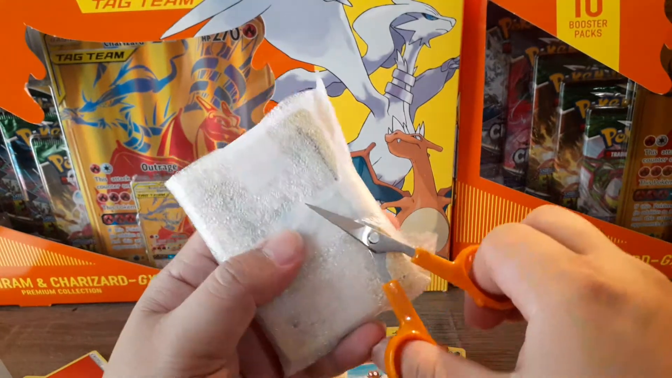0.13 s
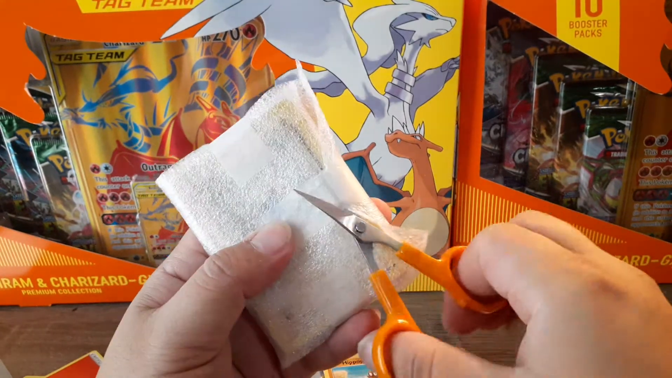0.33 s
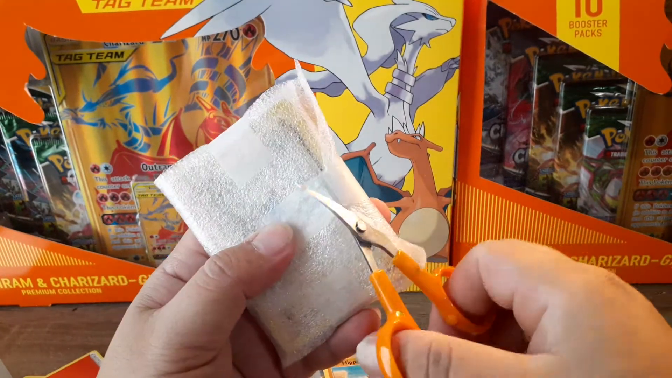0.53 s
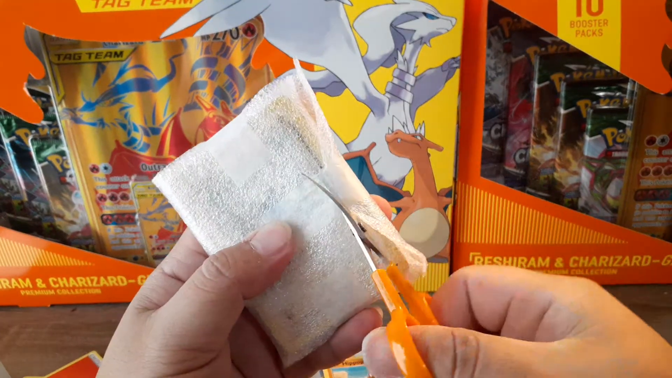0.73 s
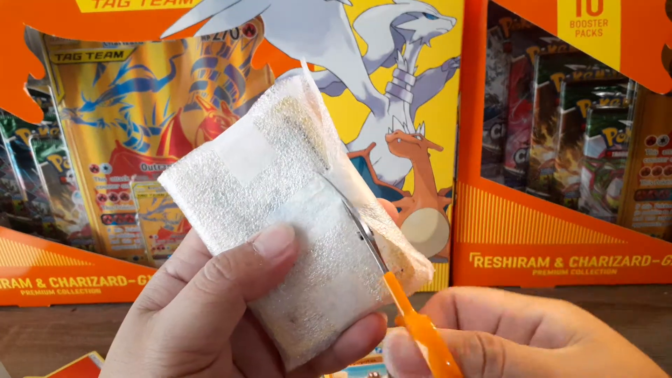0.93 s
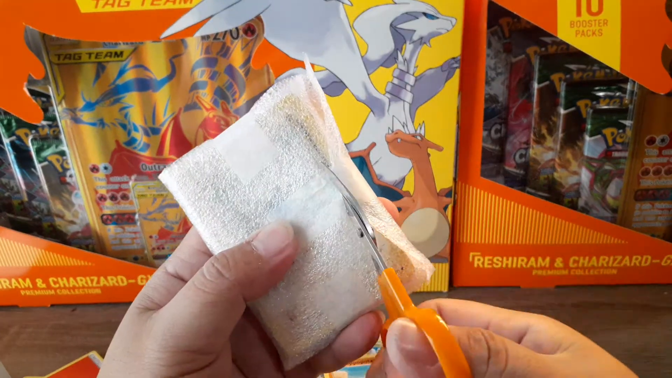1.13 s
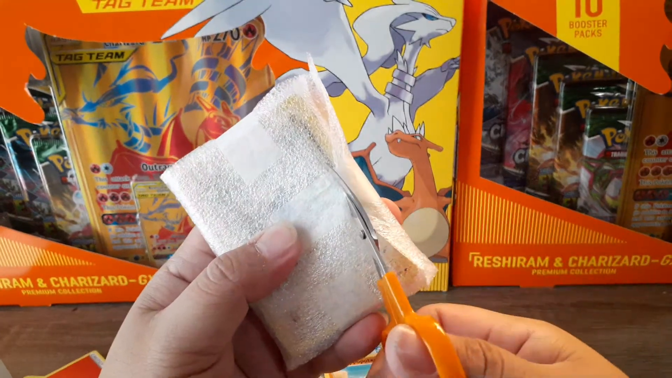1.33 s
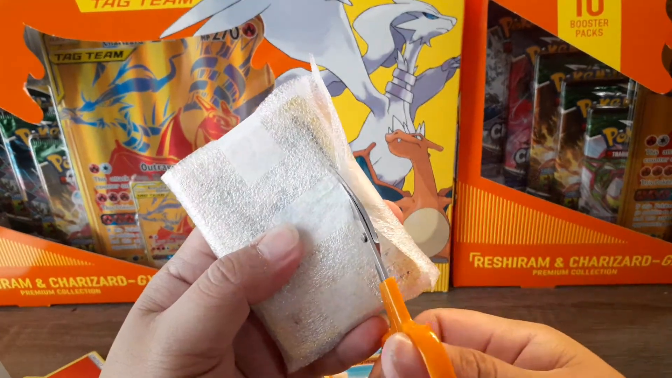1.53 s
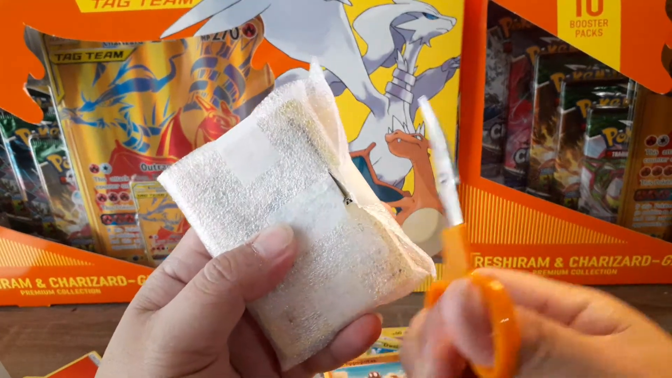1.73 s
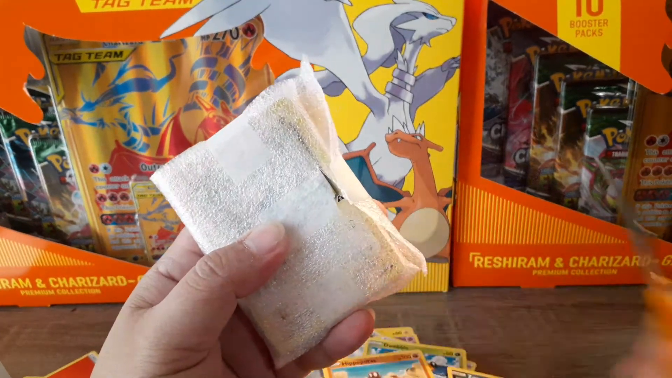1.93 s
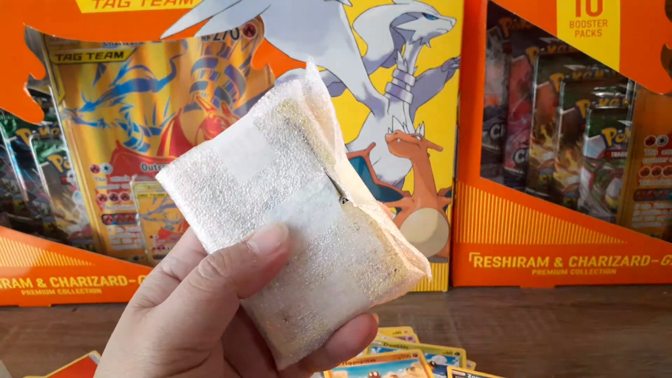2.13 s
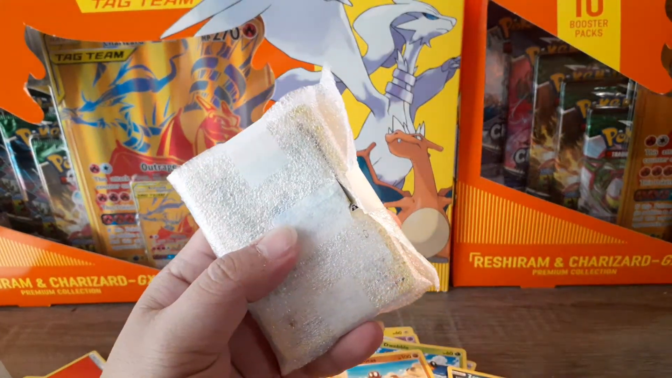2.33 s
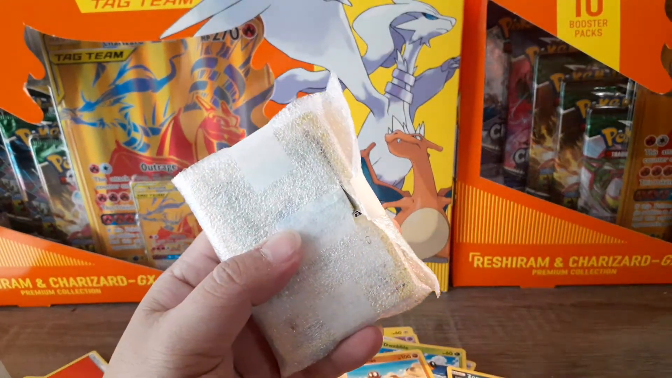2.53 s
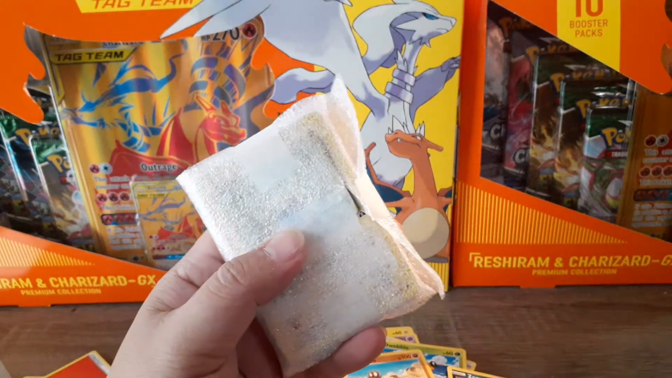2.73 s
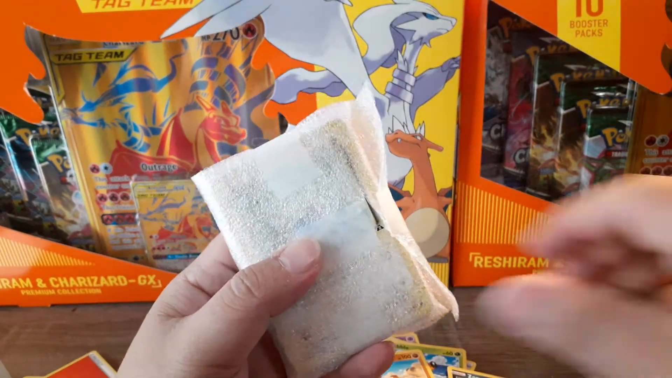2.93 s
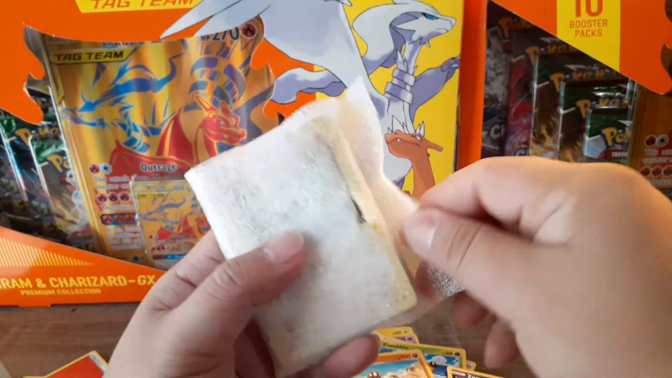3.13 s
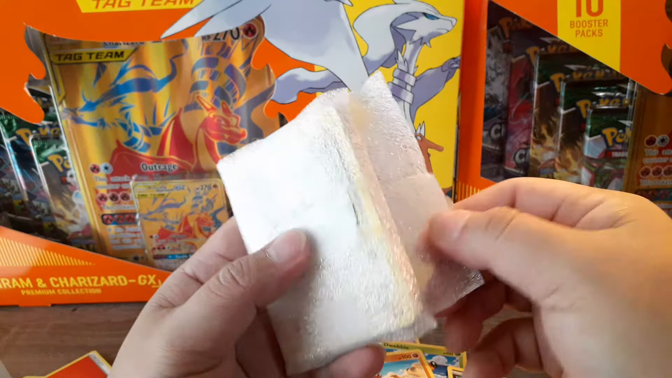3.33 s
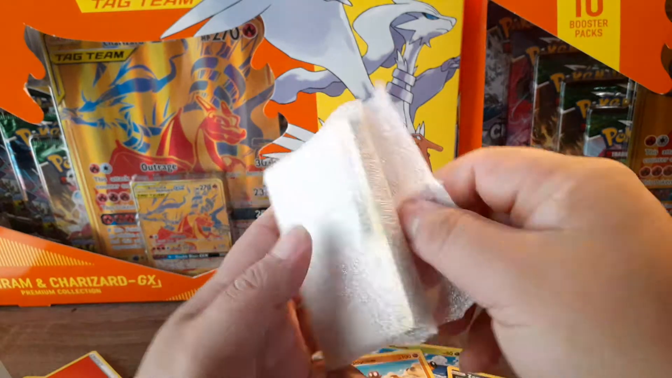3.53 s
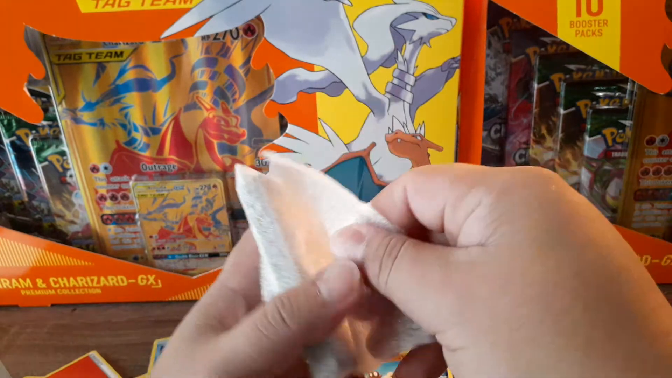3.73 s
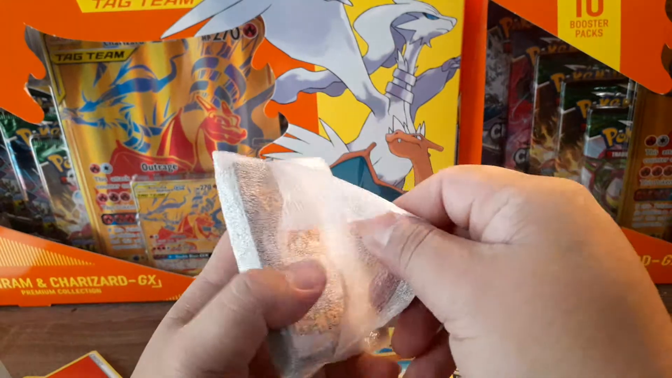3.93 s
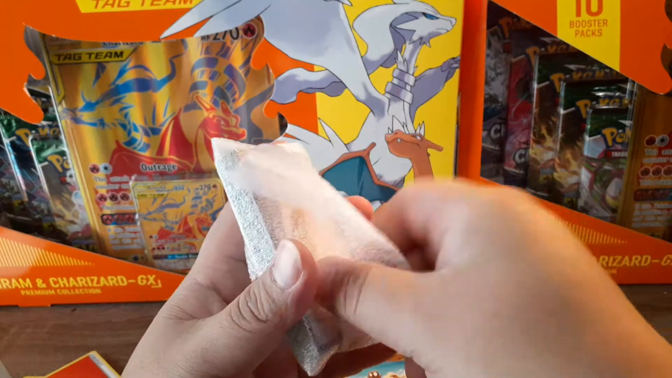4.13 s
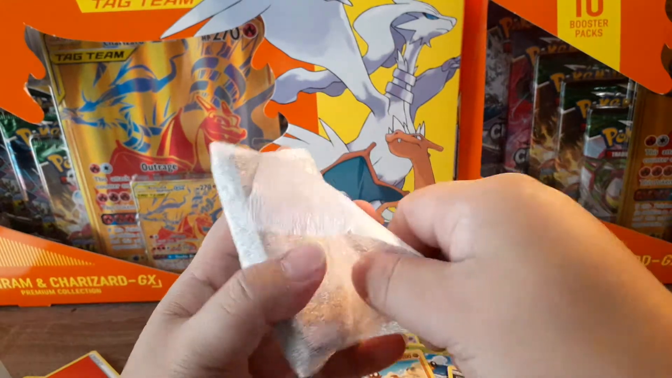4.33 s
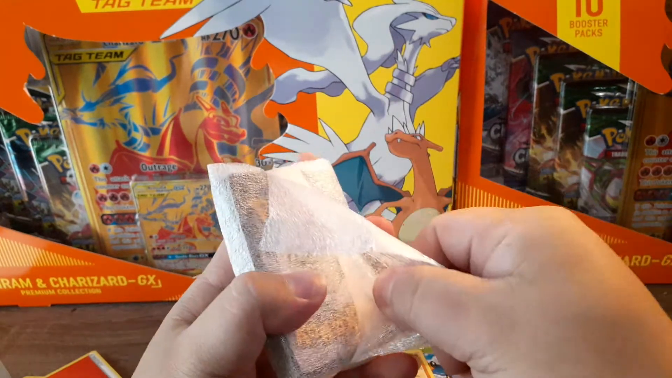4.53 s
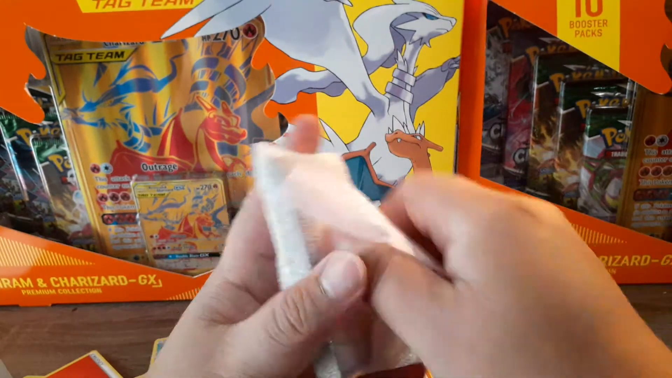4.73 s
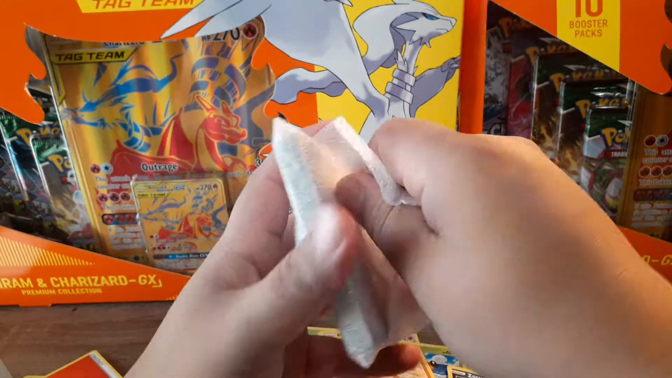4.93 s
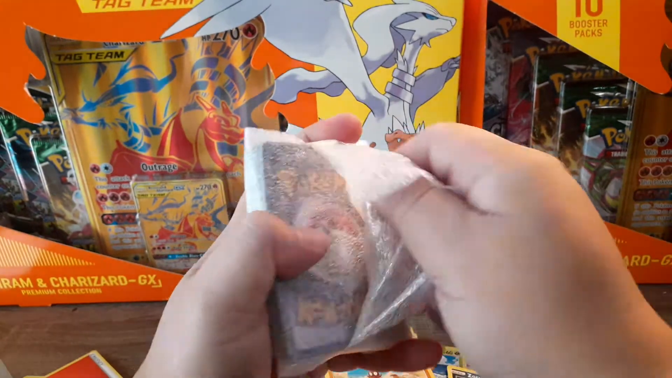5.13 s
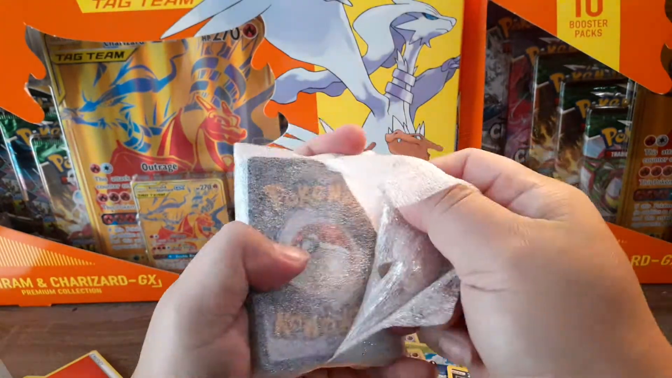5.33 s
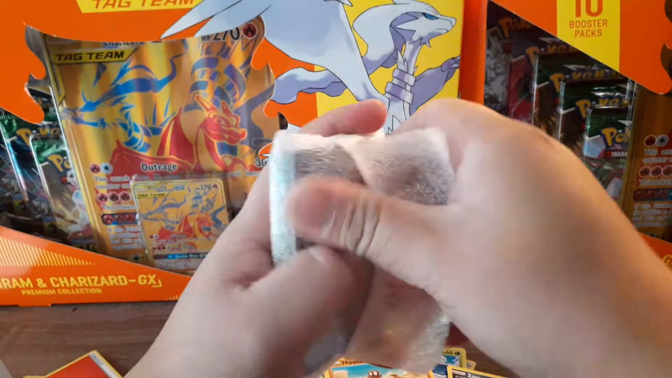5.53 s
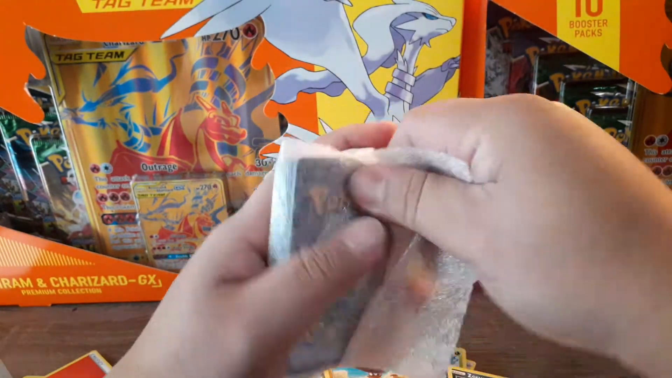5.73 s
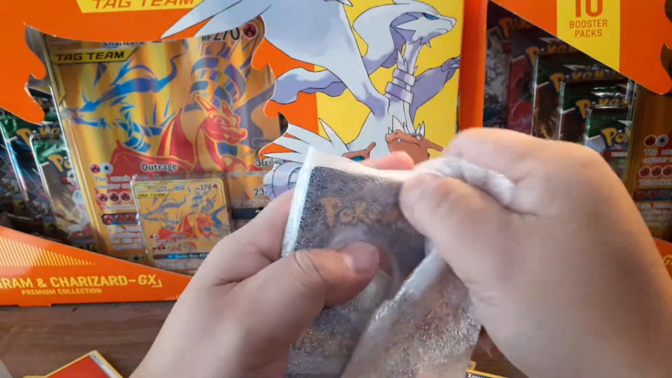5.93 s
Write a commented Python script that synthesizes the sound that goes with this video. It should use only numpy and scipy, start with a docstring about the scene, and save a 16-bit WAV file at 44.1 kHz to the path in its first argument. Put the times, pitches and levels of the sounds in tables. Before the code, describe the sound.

A quiet indoor close-up: two soft foamy pushes of small scissor blades, near silence with light metal ticks, and a crisp double steel clack. Plastic handles tick and bounce on a wooden tabletop, which rings briefly. Then hands bump softly and handle the foam pouch, with grainy rubbing, airy fizz and bursts of crackling that get louder and busier until the end. Sounds sit a little left of centre.

```python
"""In a small room with a low hum, close to a camera's two microphones, small scissors slide through a thin foam
pouch: the blades hiss, foam cells part and tick, and the edges clack shut. The scissors are then put down on a
wooden table, where handle ticks set the wood's modes ringing. Last, fingers pull the pouch open: grainy noise
rubs and fizzes, pulses crinkle and snap, the wall pops with sagging tones, and the hands bump in low thuds, all
a little left of the microphones."""
import sys
import numpy as np
from scipy import signal
from scipy.fft import rfft, irfft, next_fast_len
from scipy.io import wavfile
from scipy.ndimage import uniform_filter1d, map_coordinates

SR = 44100
rng = np.random.default_rng(int(sys.argv[2]) if len(sys.argv) > 2 else 0)


def to_wav(s):
    """Save 16-bit WAV."""
    ch = np.atleast_2d(s).T  # columns
    pcm = np.round(np.clip(ch, -1, 1) * 32767)  # PCM
    wavfile.write(sys.argv[1], SR, pcm.astype(np.int16))


N = 268569  # samples

# All levels are relative, before the gains in each source's mix.
# Strokes of the fingers over the foam.
# Each row: start in seconds, length in seconds, coarse rub in dB, fine fizz in dB.
STROKES = [(3.096, 0.024, -52, -49), (3.138, 0.085, -60, -54), (3.395, 0.017, -42, -42.5),
           (3.448, 0.25, -54, -54.5), (3.783, 0.07, -51.5, -44), (3.903, 0.05, -57.5, -53),
           (4.112, 0.033, -36.5, -37.5), (4.289, 0.085, -48, -46.5), (4.477, 0.015, -40, -34.5),
           (4.738, 0.0073, -32, -37), (4.773, 0.049, -45.5, -41.5), (4.865, 0.056, -44, -45.5),
           (4.929, 0.078, -45, -58), (5.046, 0.025, -47, -41.5), (5.149, 0.04, -40, -32),
           (5.228, 0.067, -40.5, -33.5), (5.324, 0.028, -48.5, -41), (5.484, 0.022, -32.5, -34.5),
           (5.634, 0.051, -40.5, -38), (5.716, 0.28, -52.5, -46), (6.025, 0.15, -40, -39)]
# A stroke or a parting of cells swells, holds and dies away: seconds for 20 dB.
STROKE_ATTACK_S, STROKE_RELEASE_S = 0.041, 0.035
# The fingers are on the foam, and small creases come in the later part: start and length in seconds.
HANDLING, CRUMPLING = (3.085, 3.0), (4.7, 1.385)
# Between strokes the held pouch keeps rustling.
HELD_RUB_DB, HELD_FIZZ_DB = -64.5, -56
# Large creases of the pouch buckling.
# Each row: start in seconds, level in dB, 1 kHz body in dB, 11 kHz sheen in dB.
SNAPS = [(3.0866, -42.5, 7.5, -4.5), (3.1357, -21, -3, -3), (3.395, -37, 7.5, -7.5),
         (3.6431, -37, -5.5, -8.5), (3.9525, -36.5, 2.5, 0.5), (4.1176, -39, 5, -1.5),
         (4.382, -41.5, -1, -12), (4.4013, -31.5, -1, 8), (4.408, -35, -3, 9.5), (4.4212, -27.5, 4, 13),
         (4.447, -18.5, -13, 3.5), (4.474, -21, -28, 6.5), (4.4809, -30, 11.5, 1), (4.493, -22.5, -8.5, 0),
         (4.7173, -17.5, 2.5, -3), (4.7321, -32.5, 5, -3), (4.8106, -29, -9, -3), (5.061, -29, -10, -11.5),
         (5.1216, -23, 3.5, -3), (5.1459, -21.5, -12, -3.5), (5.1621, -28.5, -13, 8),
         (5.1775, -26.5, -2.5, -7.5), (5.2293, -26, -7, -0.5), (5.246, -18.5, -13, 0.5),
         (5.3545, -38, -10, -6), (5.4916, -21, -7.5, -2.5), (5.4975, -27.5, 7, -8.5),
         (5.5428, -25.5, -1.5, 0.5), (5.7022, -30, -22, 1.5), (5.7352, -29.5, -20, 8.5),
         (5.819, -35, -22, -3), (5.889, -35.5, -6.5, -11.5), (5.8974, -34.5, -19, -7.5),
         (5.9105, -34, -6.5, -8), (5.9584, -32.5, -2, -6.5), (5.972, -32.5, -0.5, -6.5),
         (6.012, -27, -3, -22), (6.023, -27, 2, -6), (6.0505, -34, -5, -3.5), (6.0702, -26.5, -14, -0.5),
         (6.0759, -26.5, -8, 1)]
# Each large crease springs back once, a moment later and weaker.
REBOUND_S, REBOUND_DB = 0.0056, -11.5
# Shiver of the foam after a snap: level in dB and t60 in seconds.
SHIVER_DB, SHIVER_T60_S = -14, 0.035
# Small creases, against the mean dB of rub and fizz.
CRINKLES_PER_S, CRINKLE_DB = 90, -2
# Slips of single foam cells, under fingers and blades alike.
SLIPS_PER_S = 900
# Colours of the rub, the fizz and the snaps. Each row: frequency in Hz, density in dB per Hz.
RUB_SPECTRUM = [(120, -32), (420, 8.5), (700, -8), (1300, -1), (2600, 4), (4500, 0.5), (7000, -3),
                (16000, -36.5)]
FIZZ_SPECTRUM = [(2000, -6), (4000, -7), (5500, 2), (8500, -2), (12000, 5), (15500, 9), (17000, -36.5)]
SNAP_SPECTRUM = [(100, 3), (400, -19), (900, 5.5), (7000, 9), (16000, 9.5)]
# How alike close sounds reach the two microphones.
# Each row: frequency in Hz, left-right likeness (1 is identical).
FOAM_ALIKE = [(300, 0.99), (1500, 0.24), (5000, 0.029), (15000, 0.083)]
# The pouch wall flexing like a small drum.
# Each row: start in seconds, level in dB, settled pitch in Hz, t60 in seconds, higher ring in dB.
FLEXES = [(1.656, -34, 409, .03, -4), (3.14, -31.5, 425, 0.03, 2), (4.447, -28.5, 293, 0.0086, -20),
          (4.492, -33, 330, 0.0089, -10), (4.733, -19, 426, 0.056, -2), (5.2447, -15, 260, 0.0077, -13),
          (5.49, -25, 224, 0.035, -22), (5.493, -21, 395, 0.028, -10), (5.681, -20.5, 550, 0.015, 0.5)]
# The wall slackens as it rings: its pitch starts this share higher and sinks with this time constant.
FLEX_SAG, FLEX_SAG_S = 0.15, 0.008
RING_HZ = 1340  # the brief higher ring of the stiff stack of cards inside

# Ticks of foam cells cut by the blades, and the steel edges clacking shut. # Each row: start in seconds, level
# in dB, 1 kHz body in dB, 11 kHz sheen in dB.
BLADES = [(0.0628, -36.5, -6, 5), (0.3884, -43.5, 8, 11), (0.4527, -44, -15, 4), (0.4926, -42, -3, 7),
          (0.5493, -45.5, 5, 5.5), (0.786, -48, 2, 1), (1.1172, -53.5, -7.5, 2), (1.3678, -44.5, -15, 0),
          (1.4964, -50, -1, 1.5), (1.6254, -18.5, -5.5, -7.5), (1.6457, -10, -8, -7),
          (1.648, -25.5, 6.5, -17.5), (1.6565, -27, 3.5, -22)]
# Pushes of the blades through the foam, and last their skid on the table.
# Each row: start in seconds, length in seconds, level in dB.
PUSHES = [(0.067, 0.025, -41), (0.112, 0.024, -34), (0.387, 0.5, -67), (1.365, 0.13, -65.5),
          (1.622, 0.057, -42), (2.523, 0.028, -44.5), (2.567, 0.015, -29)]
# A push swells, holds and dies away: seconds for 20 dB.
PUSH_ATTACK_S, PUSH_RELEASE_S = 0.018, 0.012
# The scissors are in the foam (start and length in seconds); between pushes they keep gliding.
CUTTING, GLIDE_DB = (0.0, 1.6), -70.5
# Foam cells parting along the blades. Each row: start in seconds, length in seconds, level in dB.
SHEARS = [(0.03, 0.45, -70), (0.4, 0.37, -64.5), (0.76, 0.24, -71), (1.85, 0.061, -69)]
# Stray ticks of foam cells cut by the blades, against the glide.
TICKS_PER_S, TICK_DB = 14, 0.5
# Scatter in strength of the stray ticks and small creases.
STRAY_SPREAD_DB = 4
# Colours of the glide, the cells' airy rustle and the steel contacts.
# Each row: frequency in Hz, density in dB per Hz.
GLIDE_SPECTRUM = [(300, -10), (1500, -6.5), (3500, 0), (6500, 1.5), (9000, -10), (13000, 3), (16000, -1.5)]
AIRY_SPECTRUM = [(5000, -24.5), (12500, -2), (16000, 1)]
STEEL_SPECTRUM = [(100, -35.5), (900, -5), (2200, 6), (3000, 0), (3800, 4.5), (5400, 9), (8800, 1),
                  (14000, 4)]
# The scissors' own ringing notes. Each row: frequency in Hz, level in dB, t60 in seconds.
SCISSOR_RING = [(1850, -18, 0.04), (2253, -13, 0.045), (2780, -9.5, 0.05), (5250, -9, 0.045),
                (7316, -16, 0.035)]

# The scissors landing on the table.
# Each row: start in seconds, knock in dB, tick in dB, 11 kHz sheen in dB.
LANDING = [(2.3325, -45.5, -38.5, -25.5), (2.448, -47.5, -38.5, -27), (2.5605, -41, -24.5, -2),
           (2.5695, -18, -22, 4), (2.5868, -26, -27.5, -2), (2.597, -44.5, -36, -5.5)]
# Main modes of the table top.
# Each row: frequency in Hz, level in dB, t60 in seconds, left minus right in dB.
TABLE_MODES = [(214, -13, 0.061, -1), (285.6, 5.5, 0.11, 4.5), (341.7, -12, 0.21, -6), (431, -4.5, 0.1, 3),
               (531, -1, 0.065, -1), (887, -14, 0.08, 4.5), (1031, -6.5, 0.07, 2.5), (1350, -14, 0.051, 6)]
# Each mode takes a few cycles to build up, so a knock starts bright and turns hollow.
SWELL_CYCLES = 1.5
# Colours of the plastic handles and of the wood's dense lesser modes.
# Each row: frequency in Hz, density in dB per Hz.
HANDLE_SPECTRUM = [(200, -2), (1300, -5), (1900, 4), (2300, 1.5), (2850, 11), (3700, 9), (7300, 7),
                   (16000, -19.5)]
WOOD_SPECTRUM = [(60, -11), (125, 2), (300, 8), (540, 7), (680, -13.5), (1050, -0.5), (1500, -15.5),
                 (4000, -32.5)]

# Soft bumps of the hands. Each row: start in seconds, level in dB, pitch in Hz.
BUMPS = [(0.764, -48.5, 135), (3.1, -38, 81.5), (3.17, -37.5, 95), (3.22, -33.5, 72.4),
         (3.41, -37.5, 144.5), (3.445, -31.5, 110), (3.536, -33.5, 86.5), (3.6, -34.5, 101),
         (3.64, -34, 92), (3.706, -35, 86), (3.836, -38, 73)]
# How much louder the left microphone hears each source than the right.
BLADES_LEFT_DB, FOAM_LEFT_DB, BUMPS_LEFT_DB = 6, 5, 12

# Colour of the room's air. Each row: frequency in Hz, density in dB per Hz.
AIR_SPECTRUM = [(30, -1), (100, -2), (180, -4), (400, -13), (570, -18), (780, -16.5), (1300, -29.5),
                (1520, -28.5), (1800, -23.5), (2200, -27), (2700, -38), (8500, -46.5), (15500, -40)]
# How alike the air is at both microphones. Each row: frequency in Hz, left-right likeness.
AIR_ALIKE = [(60, 0.72), (290, 0.83), (640, 0), (3000, 0)]
# Faint lasting tones in the room. Each row: frequency in Hz, level in dB.
TONES = [(285.3, -71), (360.7, -74), (839.8, -79)]
# Decay of the room's tail. Each row: frequency in Hz, t60 in seconds.
ROOM_DECAY = [(200, 0.41), (1000, 0.3), (4000, 0.29), (14000, 0.24)]
TOP_HZ = 16200  # the camera's band limit


def foam():
    """Foam under the fingers rubs and fizzes as cells slip; its creases crinkle, snap and spring back."""
    moves = [(*HANDLING, HELD_RUB_DB, HELD_FIZZ_DB), *STROKES]
    rub_moves = [(s, length, db) for s, length, db, _ in moves]
    fizz_moves = [(s, length, db) for s, length, _, db in moves]
    rub_db = gestures(rub_moves, STROKE_ATTACK_S, STROKE_RELEASE_S)
    fizz_db = gestures(fizz_moves, STROKE_ATTACK_S, STROKE_RELEASE_S)
    grip_db = 1.2 * wobble(45)
    rub = crackle(RUB_SPECTRUM, SLIPS_PER_S, spread_db=3.8, grain_t60=.004, smooth=.35, patchy_db=3.1)
    fizz = crackle(FIZZ_SPECTRUM, SLIPS_PER_S, spread_db=4.1, grain_t60=.002, smooth=.35, patchy_db=2)
    rebounds = [(s + REBOUND_S, db + REBOUND_DB, body_db, sheen_db) for s, db, body_db, sheen_db in SNAPS]
    crinkle_db = (rub_db + fizz_db) / 2 + CRINKLE_DB
    crinkles = stray(CRUMPLING, CRINKLES_PER_S, crinkle_db, STRAY_SPREAD_DB, colour_db=1.5)
    snaps = clicks([*SNAPS, *rebounds, *crinkles], SNAP_SPECTRUM, t60=0.014,
                   after_db=SHIVER_DB, after_t60=SHIVER_T60_S, echo=0.49, echo_s=0.00074)
    rubbing = amp(rub_db + grip_db - 3.5) * rub
    fizzing = amp(fizz_db + grip_db - 0.46) * fizz
    return (rubbing + fizzing + snaps) * pan(FOAM_LEFT_DB)


def flexes():
    """The pouch wall pops over: a hollow, sagging main mode and a noisy flutter, and the stiff cards inside
    answer with a brief higher ring."""
    out, t = np.zeros(N), np.arange(SR // 5) / SR
    for s, db, hz, t60, ring_db in FLEXES:
        noise = rng.standard_normal(len(t))
        flutter = unit(filtered(noise, lambda f: 1 / (1 + (f / (3.2 * hz)) ** 8)))
        phase = 2 * np.pi * hz * np.cumsum(1 + FLEX_SAG * np.exp(-t / FLEX_SAG_S)) / SR
        wall = amp(-60 * t / t60) * (np.sin(phase) + 0.3 * flutter)
        ring = amp(ring_db - 60 * t / 0.018) * np.sin(2 * np.pi * RING_HZ * t)
        onset = 1 - np.exp(-t / 0.0008)
        add(out, s, amp(db) * (wall + ring) * onset)
    return out * pan(8)


def scissors():
    """Blades hiss through foam whose cells part with an airy rustle and tick as they are cut; steel edges clack
    shut."""
    slide_db = gestures([(*CUTTING, GLIDE_DB), *PUSHES], PUSH_ATTACK_S, PUSH_RELEASE_S)
    friction = crackle(GLIDE_SPECTRUM, SLIPS_PER_S, spread_db=3, grain_t60=.004, smooth=.7, patchy_db=1.5)
    shear_db = gestures(SHEARS, STROKE_ATTACK_S, STROKE_RELEASE_S) + 2 * wobble(38)
    cells = crackle(AIRY_SPECTRUM, SLIPS_PER_S, spread_db=4, grain_t60=.004, smooth=.5, patchy_db=1)
    ticks = stray(CUTTING, TICKS_PER_S, slide_db + TICK_DB, STRAY_SPREAD_DB, colour_db=0)
    contacts = clicks([*BLADES, *ticks], STEEL_SPECTRUM, t60=0.0071,
                      after_db=-13.0, after_t60=0.045, echo=0.45, echo_s=0.0025)
    ring = steel_ring([(s, db - 10, sheen_db) for s, db, _, sheen_db in BLADES])
    sliding = amp(slide_db - 5.5) * friction
    rustle = amp(shear_db) * cells
    steel = amp(-8.5) * (contacts + ring)
    return (sliding + rustle + steel) * pan(BLADES_LEFT_DB)


def steel_ring(blows):
    """Each (s, dB, sheen dB) blow rings the steel's notes in its own balance; sheen lifts the high ones."""
    out, t = np.zeros(N), np.arange(SR // 5) / SR
    for s, blow_db, sheen_db in blows:
        for hz, db, t60 in SCISSOR_RING:
            level_db = blow_db + db + 2 * rng.standard_normal() + sheen_db * (hz > 4500)
            add(out, s, amp(level_db - 60 * t / t60) * np.sin(2 * np.pi * hz * t))
    return out


def table():
    """Plastic handles tick as they land and bounce; blows ring the wood's main and dense lesser modes."""
    wood, t = np.zeros((2, N)), np.arange(SR // 2) / SR
    for s, knock_db, _, _ in LANDING:
        ring = np.zeros((2, len(t)))
        for hz, level_db, t60, left_db in TABLE_MODES:
            swell = 1 - np.exp(-t * hz / SWELL_CYCLES)
            ring += pan(left_db) * amp(level_db - 60 * t / t60) * np.sin(2 * np.pi * hz * t) * swell
        dense = stereo(rng.standard_normal((2, len(t))), WOOD_SPECTRUM, FOAM_ALIKE)
        thud = amp(-9.0 - 60 * t / 0.27) * dense * (1 - np.exp(-t / 0.002))
        add(wood, s, amp(knock_db) * (ring + thud))
    rows = [(s, tick_db, 0, sheen_db) for s, _, tick_db, sheen_db in LANDING]
    ticks = clicks(rows, HANDLE_SPECTRUM, t60=0.0089, after_db=-14, after_t60=0.19,
                   echo=1.0, echo_s=0.00083, sheen_from_hz=2700)
    steel = steel_ring([(s, tick_db, sheen_db) for s, _, tick_db, sheen_db in LANDING])
    return wood + ticks + steel


def bumps():
    """Soft flesh gives low thuds of a few cycles: a decaying sine with low noise around it."""
    out, t = np.zeros((2, N)), np.arange(SR // 4) / SR
    for s, db, hz in BUMPS:
        noise = rng.standard_normal((2, len(t)))
        thud = unit(filtered(noise, lambda f: 1 / (1 + (f / (1.64 * hz)) ** 4)))
        envelope = amp(db + 6.5 - 60 * t / 0.096) * (1 - np.exp(-t / 0.011))
        add(out, s, envelope * (np.sin(2 * np.pi * hz * t) + 1.45 * thud))
    return out * pan(BUMPS_LEFT_DB)


def background():
    """Low room noise with a slightly unsteady 71 Hz hum and a few faint, wavering tones."""
    t = np.arange(N) / SR
    air = amp(-55.5) * stereo(rng.standard_normal((2, N)), AIR_SPECTRUM, AIR_ALIKE)
    hum = amp(-57.5 + 1.5 * wobble(2.5)) * np.sin(2 * np.pi * 71 * t + .5 * wobble(4))
    tones = np.zeros(N)
    for hz, db in TONES:
        level = np.sqrt(2) * amp(db - 2.5 + 2.6 * wobble(2.7))
        tones += level * np.sin(2 * np.pi * hz * t + wobble(6))
    return (air + hum + tones) * pan(1.9)


def room(x):
    """The walls answer with a short diffuse tail: noise decaying at its own rate in each band."""
    hz, t, z = signal.stft(rng.standard_normal((2, SR // 2)), SR, nperseg=256)
    decay = amp(-60 * t / along(ROOM_DECAY, hz)[:, None]) * (1 - np.exp(-t / 0.0013))
    tail = signal.istft(z * decay, SR, nperseg=256)[1]
    return signal.fftconvolve(x, tail / np.linalg.norm(tail[0]), axes=1)[:, :N]


def clicks(rows, spectrum, t60, after_db, after_t60, echo, echo_s, sheen_from_hz=4500):
    """Each contact is a sharp pulse, a close reflection and a short shiver of the material."""
    out, t = np.zeros((2, N)), np.arange(SR // 10) / SR
    lead, span = SR // 500, SR // 250  # 2 ms of room before the pulse, 4 ms for its level
    for s, db, body_db, sheen_db in rows:
        decay = amp(-60 * t / t60) + amp(after_db - 60 * t / after_t60)
        shiver = rng.standard_normal((2, len(t))) * decay
        # The reflection's path differs from spot to spot, which gives each click its own colour.
        bounce = round(echo_s * rng.uniform(.6, 1.3) * SR)
        shiver[0, [0, bounce]] += 6 * np.array([1, echo])
        pair = stereo(np.pad(shiver, ((0, 0), (lead, 0))), spectrum, FOAM_ALIKE)
        tilt = [(1400, body_db), (2400, 0), (sheen_from_hz, 0), (9000, sheen_db)]
        pair = filtered(pair, lambda hz: amp(along(tilt, hz)))
        # The level is set by the energy up to 4 ms after the pulse.
        loudness = np.sqrt(np.sum(pair[:, :lead + span] ** 2) / (2 * span))
        add(out, s - lead / SR, amp(db) * pair / loudness)
    return out


def crackle(spectrum, rate, spread_db, grain_t60, smooth, patchy_db):
    """Friction of rms 1: foam cells catch and let go in tiny grains over a smooth hiss."""
    count = int(rate * N / SR)
    when, size = rng.random((count, 2)).T
    strength = amp(-spread_db * np.log(np.maximum(size, .01))) ** 2
    slips = np.bincount((when * N).astype(int), strength, N)
    t = np.arange(SR // 50) / SR
    power = np.abs(signal.fftconvolve(slips, amp(-120 * t / grain_t60))[:N])
    grains = np.sqrt(power / power.mean() + smooth) * rng.standard_normal((2, N))
    # The sheet changes shape all the time, and its resonances wander with it.
    z = signal.stft(grains, nperseg=256)[2]
    field = uniform_filter1d(rng.standard_normal(z.shape[1:]), size=5, axis=0)  # over frequency
    field = uniform_filter1d(field, size=9, axis=1)  # over time
    patchy = signal.istft(z * amp(patchy_db * unit(field)), nperseg=256)[1][:, :N]
    return stereo(patchy, spectrum, FOAM_ALIKE)


def gestures(rows, attack_s, release_s):
    """Level in dB over time of (start s, length s, dB) moves: each swells, holds and dies away."""
    t, power = np.arange(N) / SR, np.full(N, 1e-12)
    for s, length, db in rows:
        outside = np.maximum((s - t) / attack_s, (t - s - length) / release_s)
        power += amp(db - 20 * np.clip(outside, 0, 10)) ** 2
    return 10 * np.log10(power)


def stray(span, per_s, level_db, spread_db, colour_db):
    """Rows of chance clicks whose strength follows a level, coloured at random by colour_db."""
    start, length = span
    count = round(per_s * length)
    s = start + length * rng.uniform(.01, 1, count)
    size, body, sheen = np.clip(rng.standard_normal((count, 3)), -2, 2).T
    click_db = level_db[(s * SR).astype(int)] + spread_db * size
    return np.column_stack([s, click_db, colour_db * body, colour_db * sheen])


def stereo(pair, spectrum, alike):
    """Two signals become a coloured, partly alike pair of rms 1."""
    turn = lambda hz: np.arccos(np.clip(along(alike, hz), -1, 1)) / 2
    weights = lambda hz: amp(along(spectrum, hz)) * [np.cos(turn(hz)), np.sin(turn(hz))]
    mid, side = filtered(pair, weights)
    return unit(np.array([mid + side, mid - side]))


def pan(db):
    """Left and right gains of mean power 1, the left db louder."""
    return unit(amp([[db / 2], [-db / 2]]))


def add(track, s, sound):
    """Mix a sound into a track at s seconds."""
    part = track[..., round(s * SR):][..., :sound.shape[-1]]
    part += sound[..., :part.shape[-1]]


def filtered(x, response):
    """x times a response of frequency."""
    n = x.shape[-1]
    m = next_fast_len(n + 2048)
    return irfft(rfft(x, m) * response(np.fft.rfftfreq(m, 1 / SR)), m)[..., :n]


def wobble(rate):
    """A smooth random curve, rate knots a second."""
    knots = rng.standard_normal(int(N * rate / SR) + 4)
    return map_coordinates(knots, [np.arange(N) * rate / SR])


def along(points, hz):
    """(Hz, value) points read on a log axis."""
    f, v = np.transpose(points)
    return np.interp(np.log(hz + 1), np.log(f + 1), v)


def unit(x):
    """x at rms 1."""
    return x / np.sqrt(np.mean(x ** 2) + 1e-20)


def amp(db):
    """Decibels to gain."""
    return 10 ** (np.asarray(db) / 20)


def scene():
    """The hands work a little left, so the right microphone hears them later; the room adds its tail."""
    delay_s = np.array([[0], [.00009]])  # left, right
    later = lambda x: filtered(x, lambda hz: np.exp(-2j * np.pi * hz * delay_s))
    near = later(foam() + scissors() + table() + bumps())
    knocks = later(flexes())
    # The soft wall's knocks reach the room at half strength.
    return near + knocks + amp(-10.5) * room(near + knocks / 2) + background()


def record(dry):
    """The camera rolls off the deepest bass and keeps nothing above its band limit."""
    return filtered(dry, lambda hz: (hz < TOP_HZ) * (1 - 1 / (1 + (hz / 42) ** 6)))


dry = scene()
out = record(dry)
to_wav(out)
```